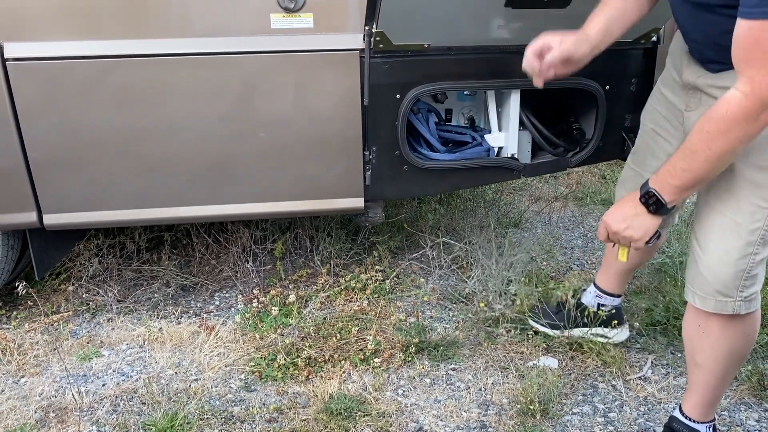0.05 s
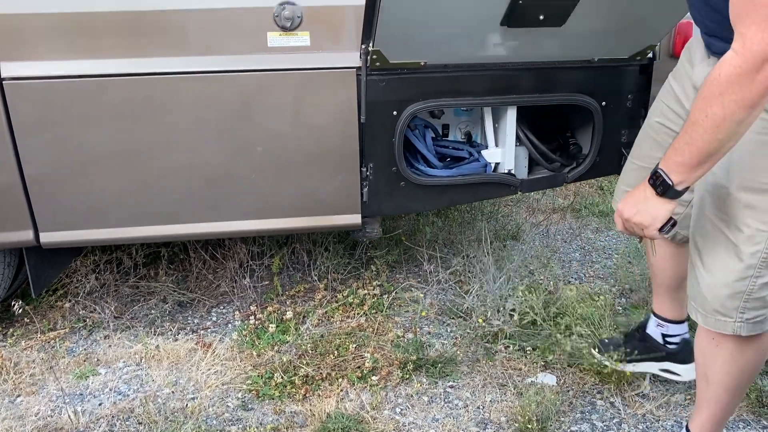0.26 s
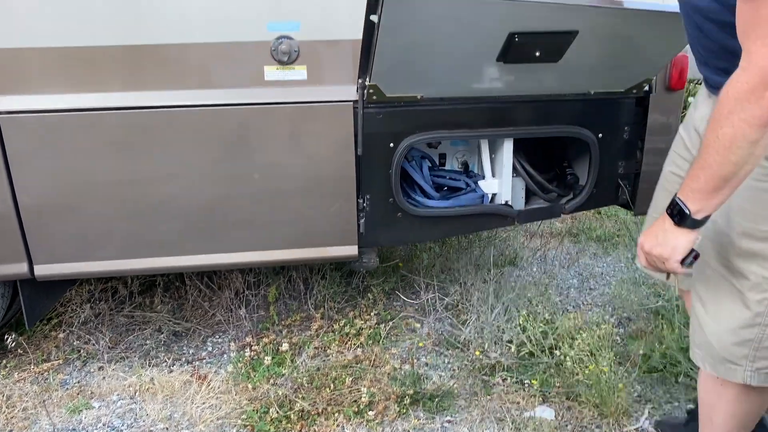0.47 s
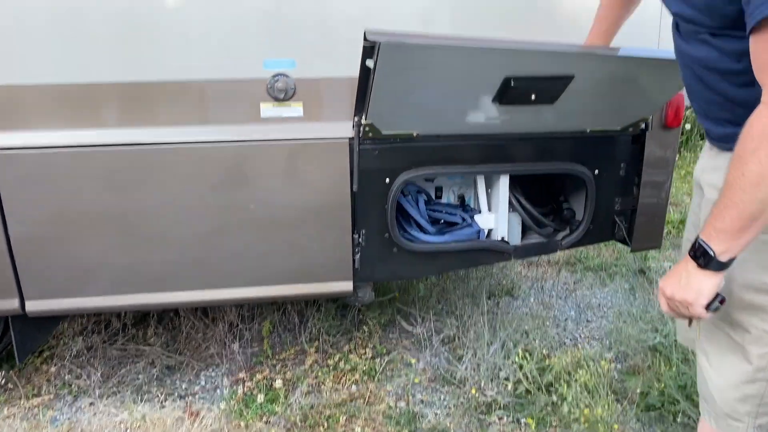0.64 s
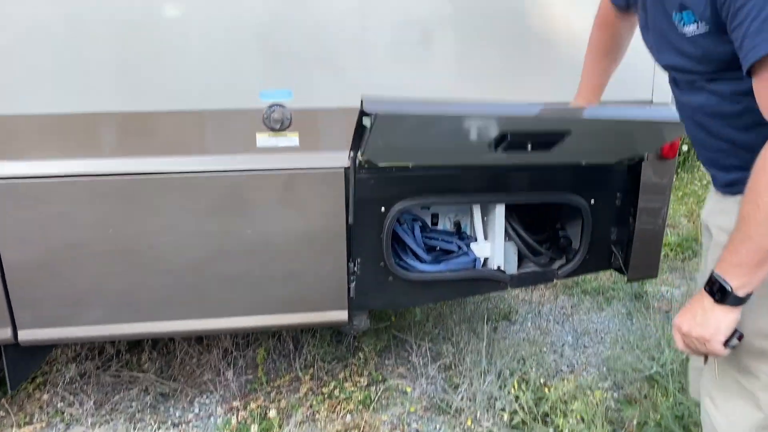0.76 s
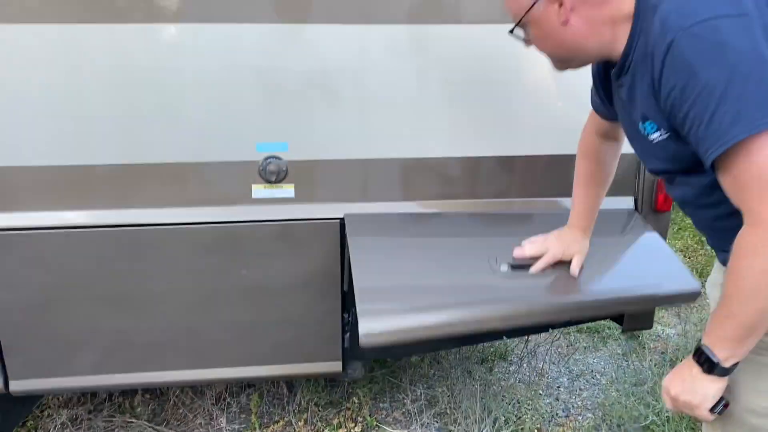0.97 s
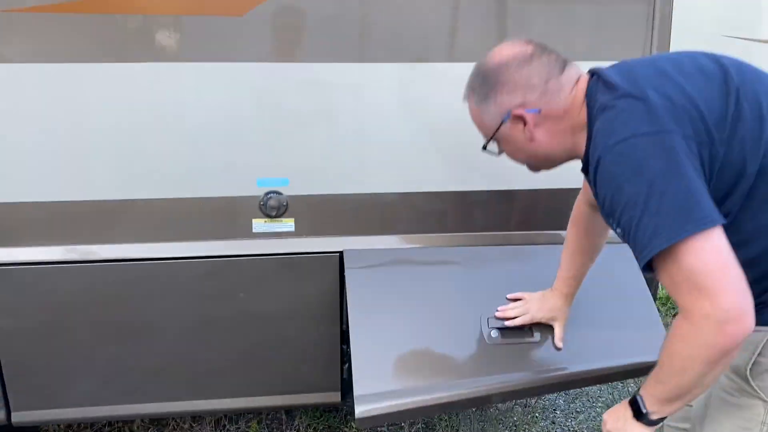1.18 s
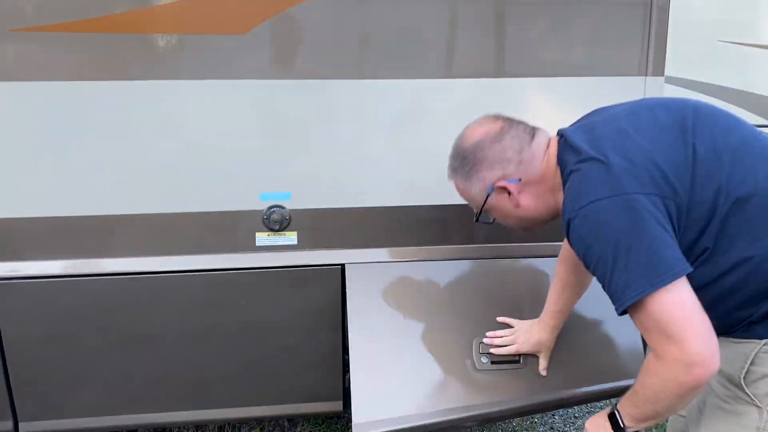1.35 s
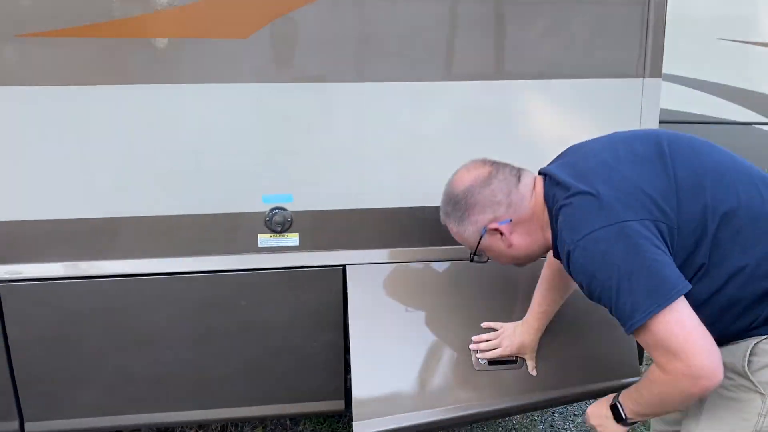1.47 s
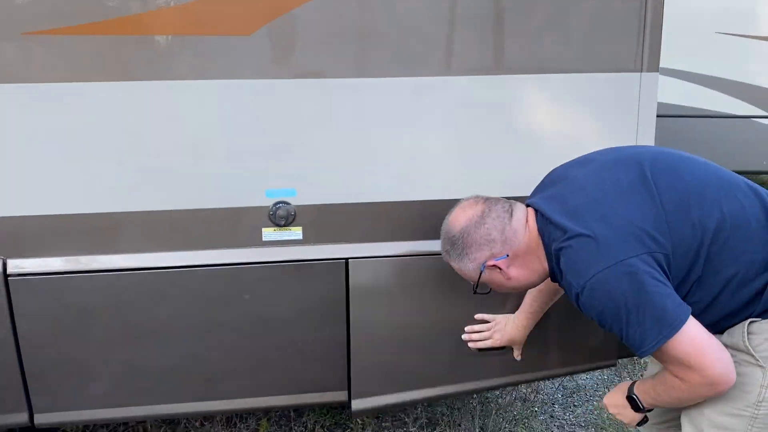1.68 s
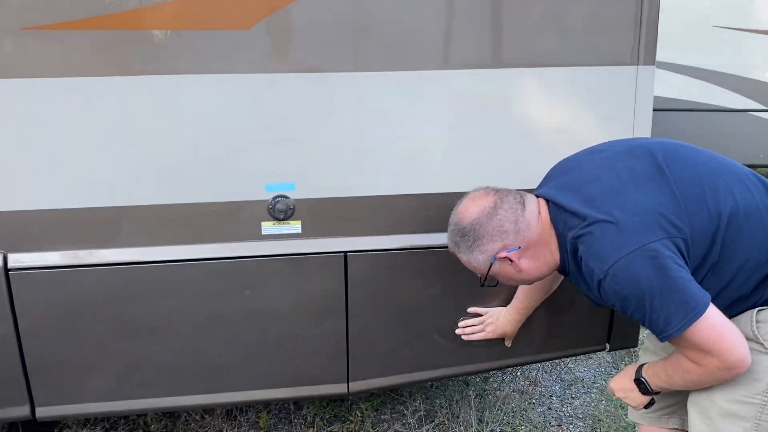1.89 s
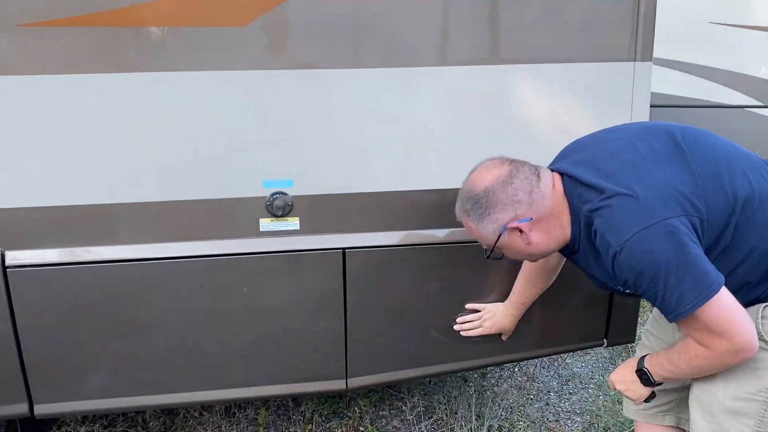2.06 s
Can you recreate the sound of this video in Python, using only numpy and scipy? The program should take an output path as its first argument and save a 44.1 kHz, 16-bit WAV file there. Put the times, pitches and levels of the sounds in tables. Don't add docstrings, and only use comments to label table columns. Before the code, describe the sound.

Outdoors beside a parked vehicle, faint pops, knocks and gravel steps lead to a loud sheet-metal hatch slam with latch clack and brief rattling ring, heard from a few metres away over soft distant rumble.

```python
import sys
import numpy as np
from scipy import signal
from scipy.fft import rfft, irfft
from scipy.io import wavfile
from scipy.ndimage import uniform_filter1d

SR = 44100
rng = np.random.default_rng(int(sys.argv[2]) if len(sys.argv) > 2 else 0)


def file_out(sig):
    cols = np.atleast_2d(sig).T
    lim = np.clip(cols, -1, 1)
    pcm = np.round(lim * 32767).astype(np.int16)
    wavfile.write(sys.argv[1], SR, pcm)


def linear_from_db(decibels):
    return 10 ** (np.asarray(decibels, float) / 20)


N = 93580
T = np.arange(N) / SR
HZ = np.fft.rfftfreq(N, 1 / SR)

# [Hz, dB per Hz]
TRAFFIC_SPECTRUM = [(30, -7), (55, -5), (76, 1), (105, -8), (200, -17.5), (700, -29.5), (1800, -35.5),
                    (8000, -54.5)]
# [s, dB]
LEAF_LEVELS = [(0, -60.5), (.3, -62.5), (.45, -73), (.8, -72), (1.2, -70), (1.4, -62), (1.55, -71),
               (1.7, -82)]
# [Hz, dB per Hz]
LEAF_SPECTRUM = [(2000, -21.5), (5000, -6), (8000, -11.5), (11000, -2), (14000, -1.5), (15300, -0.5),
                 (16000, -19)]
# [s, s, dB]
CRUNCHES = [(0.19, 0.24, -61.5), (0.602, 0.044, -52.5), (0.68, 0.081, -55.5), (0.757, 0.1, -52),
            (0.851, 0.035, -59), (0.955, 0.18, -57), (1.292, 0.056, -61), (1.347, 0.049, -63),
            (1.408, 0.08, -52.5), (1.491, 0.048, -55), (1.917, 0.13, -54.5)]
# [Hz, dB per Hz]
GRAVEL_SPECTRUM = [(150, 5), (700, 7.5), (2000, -4), (4000, -8.5), (8000, -16.5), (15500, -24)]
# [s, s, Hz, dB]
HINGE_SQUEAKS = [
    (1.294, 0.0094, 960, -55),
    (1.334, .01, 900, -61),
    (1.399, 0.014, 857, -56),
]
# [s, Hz, dB, s]
JINGLES = [
    (1.877, 4810, -63, 0.034),
    (1.913, 4300, -59.5, 0.015),
    (1.927, 6100, -70, 0.019),
    (1.944, 3990, -67, .03),
    (1.971, 5980, -70, 0.0075),
]
# [s, dB, Hz, Hz]
CATCH_POPS = [
    (.4905, -36.5, 1010, 374),
    (0.5596, -42.5, 900, 396),
]
# [s, dB, Hz, Hz]
SMALL_TICKS = [(.416, -43.5, 11200, 8950), (.4905, -46, 1690, 2000), (.4895, -47.5, 6100, 9000),
               (.591, -48, 2760, 1500), (.601, -56, 4400, 1500), (.613, -61, 3300, 1000),
               (.631, -51, 3320, 800), (.667, -46, 3500, 3000), (.671, -47, 3000, 2500),
               (0.711, -48.5, 6160, 1200), (0.7129, -40, 9800, 4000), (0.7205, -45, 8950, 4000),
               (0.756, -45, 9700, 1980), (.778, -52, 6200, 2500), (0.835, -57, 3970, 8000),
               (.857, -46, 9670, 6000), (1.067, -44, 9500, 6000), (1.072, -46, 2500, 2500),
               (1.3573, -37, 13700, 5000), (1.3617, -40, 2600, 4000), (1.4085, -48, 2500, 4000),
               (1.414, -37, 5000, 7000), (1.435, -42, 4500, 3000), (1.652, -49.5, 4080, 3030),
               (1.6864, -40.5, 3000, 4000), (1.686, -38.5, 13400, 5860), (1.882, -48, 4200, 1500),
               (1.886, -47, 3800, 3000), (1.92, -51, 3500, 2500), (2.038, -54, 6000, 8000)]
# [s, dB, Hz, s]
CATCH_KNOCKS = [(.4905, -44, 604, 0.013), (.494, -42.5, 300, 0.043), (.5595, -45.5, 646, .015),
                (.564, -45, 313, .04), (0.5903, -48, 1520, 0.017), (.597, -41.5, 840, 0.018),
                (.609, -43.5, 835, 0.035), (0.613, -43, 1000, 0.025), (.668, -31, 958, 0.035),
                (0.6753, -35.5, 960, 0.027), (.673, -33.5, 458, 0.04), (.69, -43.5, 1200, .02),
                (.682, -36.5, 300, 0.072), (0.718, -40, 905, 0.02), (.7565, -37, 940, 0.027),
                (0.916, -39, 233, 0.083), (0.966, -42.5, 208, 0.026), (1.43, -42, 990, 0.018),
                (1.5405, -45, 740, 0.045), (1.547, -38, 560, 0.017), (1.915, -46, 799, 0.094)]
# [Hz, dB per Hz]
RATTLE_SPECTRUM = [(150, -19.5), (600, -2.5), (1300, -3.5), (2500, -13.5), (4600, -11.5), (7500, -22),
                   (11000, -20.5), (15500, -16.5)]
# [Hz, dB, s]
BOX_MODES = [(55.2, -12, 0.23), (59.1, -29.5, 4.5), (64, -44.5, 3.2), (95.2, -19, 0.5), (115.3, -5.5, 0.16),
             (138.1, -19.5, 0.31), (164.4, -17.5, 0.19), (207, -13, 0.23)]
# [s, dB, ms, dB]
SLAM_CONTACTS = [(1.7287, -27.5, 1.24, -23.5), (1.7329, -18.5, 0.55, 0), (1.7373, -13.5, 0.66, -7.5),
                 (1.7398, -12, 0.22, 2), (1.7436, -17, 0.41, 1), (1.748, -14.5, 0.69, -10),
                 (1.7600, -18, 0.77, -7), (1.7660, -15.5, 1.14, -14.5), (1.7759, -24.5, 0.64, 2),
                 (1.7840, -18.5, 0.91, -14), (1.7940, -31, 1.1, -21.5)]
# [Hz, dB, s]
PANEL_MODES = [(241, -8, 0.11), (305, -12, 0.08), (373, -14, 0.14), (462, -17, 0.05), (572, -9.5, 0.039),
               (611.5, -7.5, 0.082), (719, -3.5, .04), (789, 0, 0.03), (867, -2, 0.03), (991, 3, 0.056),
               (1355, -5, .04), (1422, -8.5, 0.047), (1650, 0.5, 0.052), (2159, -3, 0.047)]
# [Hz, dB, s]
FRAME_MODES = [(207, -19.5, .2), (301.3, -23.5, .22), (525, -20.5, 0.12), (687, -12, .14),
               (800, -23.5, 0.28), (951, -13.5, 0.085), (1115, -16.5, 0.1), (1234, -23, .18),
               (1497, -19, .15), (1585, -19, 0.16), (1840, -16.5, .1), (2042, -18, .11), (2223, -11, .07),
               (2418, -21, .12)]
# [Hz, dB, s]
LATCH_MODES = [(2500, -6, .008), (2930, -1, .008), (3310, -1.5, .01), (3825, -1, 0.013), (4240, -1.5, .007),
               (4710, 0, 0.0093), (5250, 2.5, .006), (5830, 0.5, 0.0063), (6400, -2.5, 0.0043),
               (7100, -4.5, 0.0036), (9330, -7, .006), (10560, -10.5, 0.0055), (12900, -2, 0.00506),
               (14300, -9, .004)]
# [Hz, dB]
STEREO_LEAN = [(60, 0.5), (110, 0), (200, 0), (380, -1), (700, -1.5), (1290, -7.5), (2380, -2.5),
               (4400, -4.5), (8120, -1), (15000, 0)]

SLAM_S, BOX_S = 1.7365, 1.743


def unit(x):
    return x / np.sqrt(np.mean(x ** 2))


def curve(points):
    p = np.array(points, float)
    return np.interp(np.log(HZ + 1), np.log(p[:, 0]), p[:, 1])


def colour(x, points):
    low_cut = 1 / (1 + (points[0][0] / (HZ + 1)) ** 4)
    return unit(irfft(rfft(x) * linear_from_db(curve(points)) * low_cut, N))


def ring(x, hz, t60):
    pole = np.exp(2j * np.pi * hz / SR - np.log(1000) / (max(t60, .0002) * SR))
    return signal.lfilter([1], [1, -pole], x)


def ringing_noise(hz, t60, db):
    return unit(ring(rng.standard_normal(N), hz, t60).imag) * linear_from_db(db)


def decay(at, rise, t60):
    growth = np.exp(np.minimum(T - at, 0) / rise)
    return growth * linear_from_db(-60 * np.maximum(T - at, 0) / t60)


def push(at, ms):
    x = np.sin(np.pi * np.clip((T - at) / (max(ms, .05) / 1000), 0, 1))
    return x / (x.sum() + 1e-9)


def scrape(at, ms):
    u = np.clip((T - at) / (ms / 1000), 0, 50)
    x = rng.standard_normal(N) * u * np.exp(-u)
    return x / np.sqrt(np.sum(x ** 2))


def walk(rate):
    k = int(SR / rate)
    steps = np.repeat(rng.standard_normal(N // k + 1), k)
    return 0.43 * uniform_filter1d(uniform_filter1d(steps, k), k)[:N]


def grains(rate, spread_db):
    chance, sign, size = rng.random((3, N))
    return unit((chance < rate / SR) * np.sign(sign - .5) * linear_from_db(-spread_db * np.log(size + 0.016)))


def traffic():
    noise = rfft([colour(rng.standard_normal(N), TRAFFIC_SPECTRUM) for _ in range(2)])
    noise[1] *= HZ / np.hypot(HZ, 1200) / np.hypot(1, HZ / 3000)
    out = np.zeros((2, N))
    for k in range(9):
        octave = np.clip(1 - abs(np.log2((HZ + 1) / 32) - k), 0, 1)
        out += irfft(noise * octave, N) * linear_from_db(-46.5 + 2 * walk(26.0))
    return out


def leaves():
    db = np.interp(T, *np.array(LEAF_LEVELS).T) + 2.0 * walk(24)
    db = db - 24 * np.maximum(T - SLAM_S, 0)
    hiss = [colour(rng.standard_normal(N), LEAF_SPECTRUM) for _ in range(2)]
    return linear_from_db(db) * hiss * linear_from_db(np.array([[0], [-1.0]]))


def outdoors():
    return (traffic() + leaves()) * linear_from_db(np.clip((T - SLAM_S) / 0.65, 0, 1))


def whine():
    return ringing_noise(576, 0.34, -66.5) * np.exp(-(T / .33) ** 6)


def bird():
    u = (T - 1.575) / 0.036
    phase = 2 * np.pi * np.cumsum(5600 - 1200 * np.clip(u, -1, 1)) / SR
    return linear_from_db(-71 + 7.3 * walk(248)) * np.exp(-(2 * u) ** 4) * np.sin(phase)


def gravel():
    stones = np.geomspace(200, 15000, num=26) * linear_from_db(.5 * rng.standard_normal(26))
    out = 0
    for hz in stones:
        out = out + unit(ring(grains(320, 3), hz, 19 / hz).imag) * np.sqrt(hz)
    return colour(out, GRAVEL_SPECTRUM)


def crunches():
    env = sum(linear_from_db(db) * np.exp(-((T - s) / (length / 2)) ** 2) for s, length, db in CRUNCHES)
    return env * [gravel(), gravel()]


def squeaks():
    waver = 2 * np.pi * np.cumsum(1 + 0.0182 * walk(150)) / SR
    out = 0
    for s, length, hz, db in HINGE_SQUEAKS:
        stack = 0
        for k in range(1, 8):
            weight = np.exp(-((k * hz - 2900) / 1760) ** 2)
            stack = stack + weight * np.sin(k * hz * waver + k * k)
        out = out + linear_from_db(db - 1.5 + 8 * walk(500)) * np.exp(-(2 * (T - s) / length) ** 2) * stack
    return out


def jingle():
    out = 0
    for s, hz, db, length in JINGLES:
        gate = np.exp(-(2 * (T - s) / length - 1) ** 4)
        out = out + gate * ringing_noise(hz, 0.0088, db)
    return out


def pops():
    sag_s, t60 = 0.00253, 0.055
    out = 0
    for s, db, high_hz, low_hz in CATCH_POPS:
        u = np.maximum(T - s, 0)
        turns = low_hz * u + (high_hz - low_hz) * sag_s * (1 - np.exp(-u / sag_s))
        out = out + linear_from_db(db - 60 * u / t60) * np.sin(2 * np.pi * turns) * np.minimum(u / 0.00052, 1)
    return out


def ticks():
    out = np.zeros((2, N))
    for s, db, hz, width in SMALL_TICKS:
        z = ring(push(s, 0.046) + linear_from_db(-6.0) * scrape(s, 0.29), hz, 6.8 / width)
        out += linear_from_db(db) * np.array([z.imag, z.real]) / abs(z.imag).max()
    return out


def knocks():
    out = np.zeros((2, N))
    for s, db, hz, t60 in CATCH_KNOCKS:
        tap = push(s, 0.19)
        z = ring(tap, hz, t60)
        z = z + linear_from_db(-3.0) * ring(tap, hz * 2.05, t60 * 0.19)
        z = z + linear_from_db(-9.5) * ring(tap, hz * 4.4, t60 * 0.11)
        z = z + linear_from_db(1) * ring(scrape(s, 6.1), hz * 1.42, 0.0067)
        out += linear_from_db(db) * np.array([z.imag, z.real])
    return out


def handling():
    out = knocks() + ticks() + crunches()
    out[0] += pops() + squeaks() + jingle()
    return out


def loose_parts_and_air():
    rise = .0014
    out = np.zeros((2, N))
    for k in range(2):
        rattle = colour(grains(12000, 2.8), RATTLE_SPECTRUM) * linear_from_db(-14.5 + 1.7 * walk(140))
        out[k] += rattle * decay(SLAM_S, rise, 0.14)
        out[k] += ringing_noise(300, 0.006, -28) * decay(SLAM_S, rise, 0.57)
        out[k] += ringing_noise(800, 0.0033, -36) * decay(SLAM_S, rise, .45)
        out[k] += ringing_noise(4000, 0.0018, -34.5) * decay(1.731, 0.0049, 0.017)
    return out


def hollow_box():
    blow = push(BOX_S, 2.96)
    modes = sum(linear_from_db(db) * ring(blow, hz, t60).imag for hz, db, t60 in BOX_MODES)
    return modes + ringing_noise(115, 0.16, -33.5) * decay(BOX_S, 0.0032, 1.02)


def strut():
    swell = 1 - np.exp(-np.maximum(T - BOX_S, 0) / .08)
    return linear_from_db(-38) * ring(push(BOX_S, 0.29), 476, 1.6).imag * swell


def clang():
    at = 1.7345
    blows = push(at, 0.58) + push(at + 0.00249, 0.51)
    return linear_from_db(-12.5) * ring(blows, 790, .03).imag


def strike(force, modes):
    out = np.zeros((2, N))
    for hz, db, t60 in modes:
        size = linear_from_db(3.46 * rng.standard_normal(len(force))) * np.sign(rng.random(len(force)) - .25)
        z = linear_from_db(db) * ring(size @ force, hz, t60)
        out += [z.imag, z.real * rng.choice([-1, 1]) * min(hz / 300, 1)]
    return out


def slam():
    force = np.array([linear_from_db(db) * push(s, ms) for s, db, ms, _ in SLAM_CONTACTS])
    sharp = np.array([linear_from_db(db + share) * scrape(s, 1.6) for s, db, _, share in SLAM_CONTACTS])
    out = strike(force, PANEL_MODES) * linear_from_db(0.5)
    out += strike(force, FRAME_MODES)
    out += strike(sharp, LATCH_MODES) * linear_from_db(-3.0)
    out[0] += hollow_box() + strut() + clang()
    return out + loose_parts_and_air()


def scene():
    slip_from_hz, slip_turn_hz = 6560, 3500
    lag_s = 19 / 480000
    near, wide = slam() + handling()
    mid, side = outdoors()
    delay = np.exp(1j * np.pi * HZ * lag_s / (1 + (HZ / slip_from_hz) ** 8))
    lean = linear_from_db(curve(STEREO_LEAN) / 2) * delay
    slip = np.exp(-1j * np.pi * np.maximum(HZ - slip_from_hz, 0) / slip_turn_hz)
    wide_part = linear_from_db(-7.5) * rfft(wide) * HZ / np.hypot(HZ, 70)
    loose = (rfft(side) + wide_part) / (1 + (HZ / 9400) ** 20)
    pair = rfft(near + bird() + whine()) * np.array([lean * slip, 1 / lean / slip])
    pair = pair + rfft(mid) * np.array([slip, 1 / slip])
    pair = pair + loose * np.array([slip, -1 / slip])
    return irfft(pair / np.sqrt(1 + (HZ / 15300) ** 40), N)


def roll_off(x):
    return signal.sosfilt(signal.butter(12, 16390, fs=SR, output="sos"), x)


def record(dry):
    low_cut = signal.butter(2, 51, "high", fs=SR, output="sos")
    top_cut = signal.ellip(8, .2, 60, 15900, fs=SR, output="sos")
    x = signal.sosfilt(low_cut, dry)
    rounded = np.tanh(1.138 * x) / 1.13
    return roll_off(signal.sosfilt(top_cut, rounded))


dry = scene()
out = record(dry)
file_out(out)
```